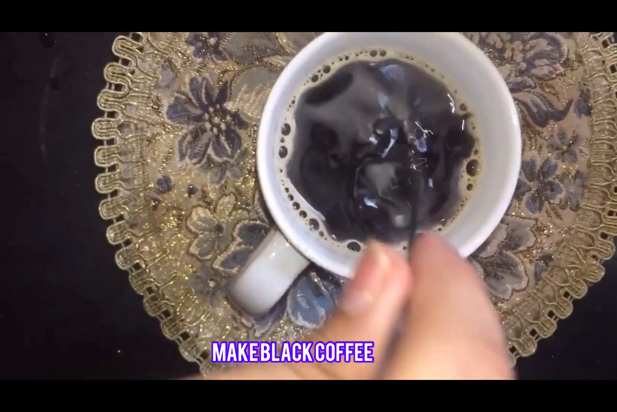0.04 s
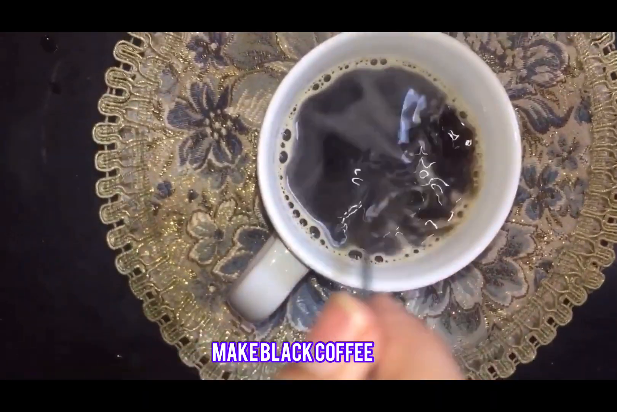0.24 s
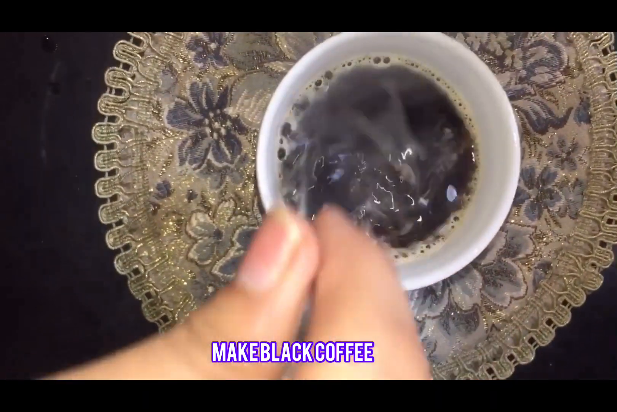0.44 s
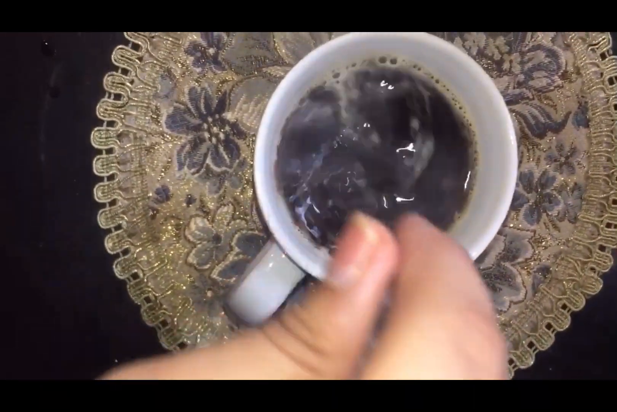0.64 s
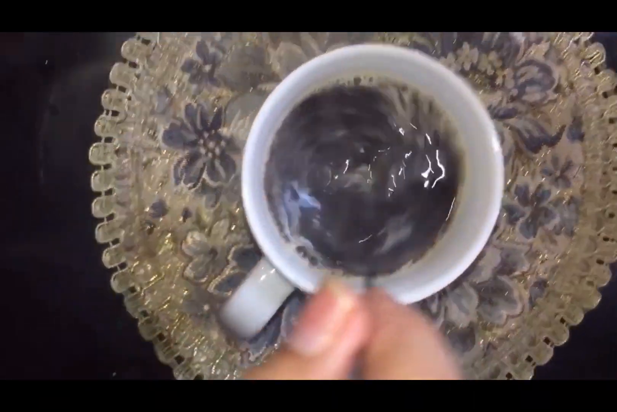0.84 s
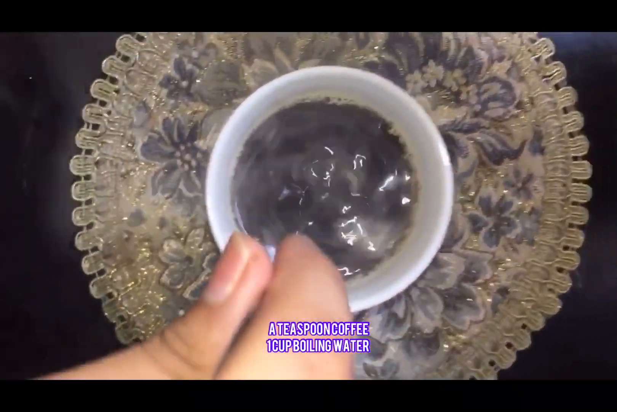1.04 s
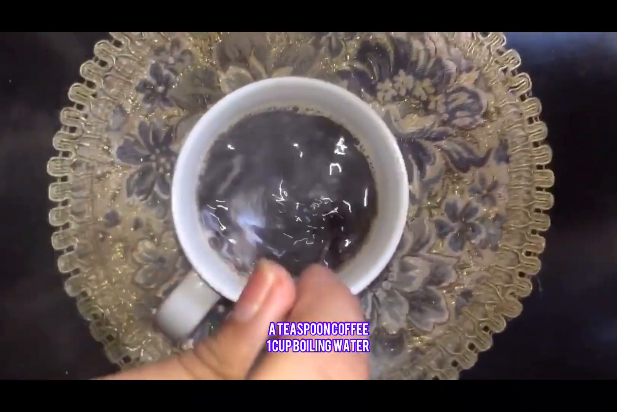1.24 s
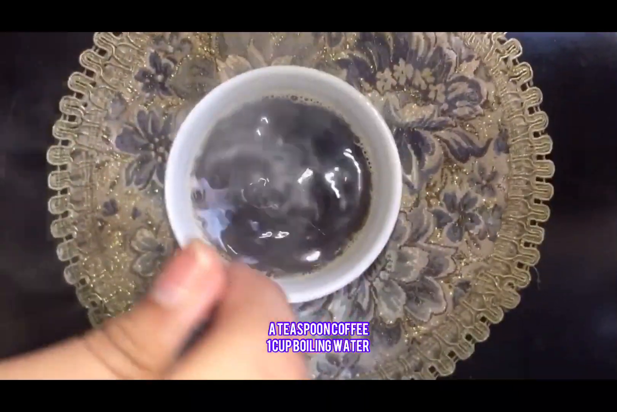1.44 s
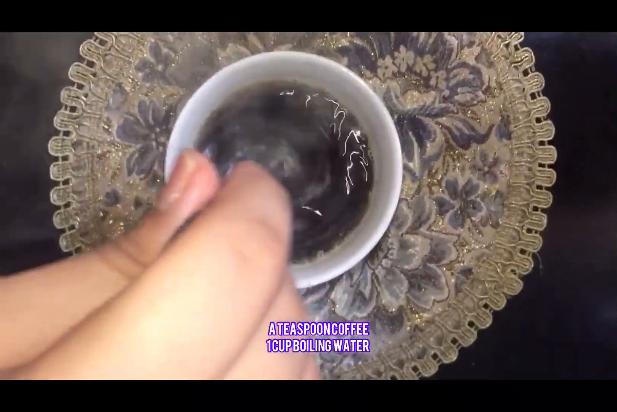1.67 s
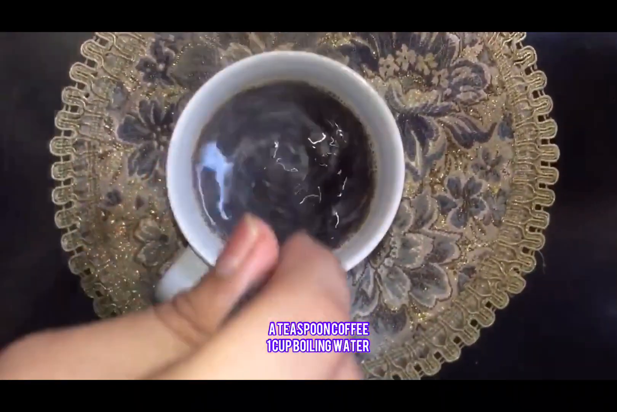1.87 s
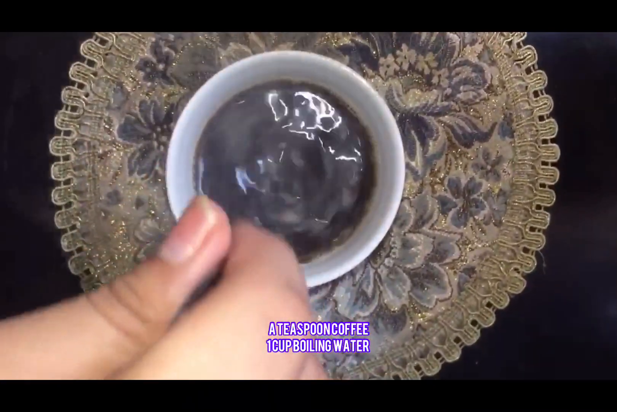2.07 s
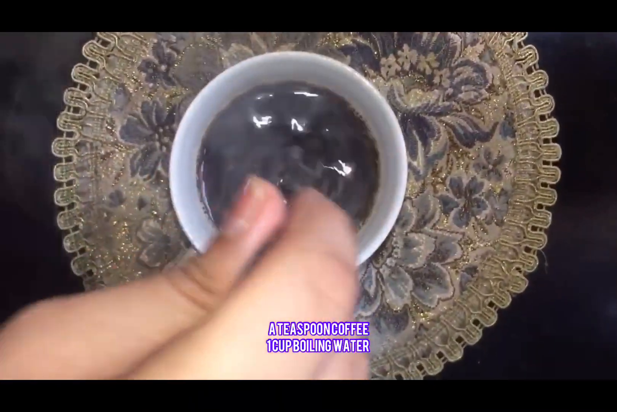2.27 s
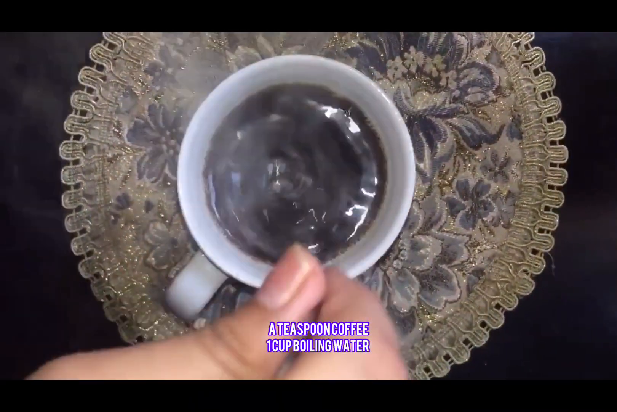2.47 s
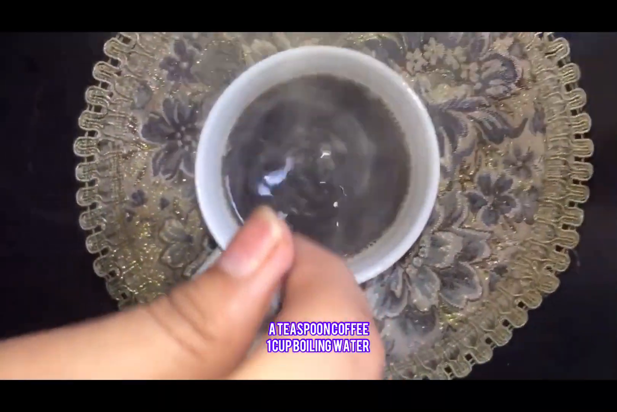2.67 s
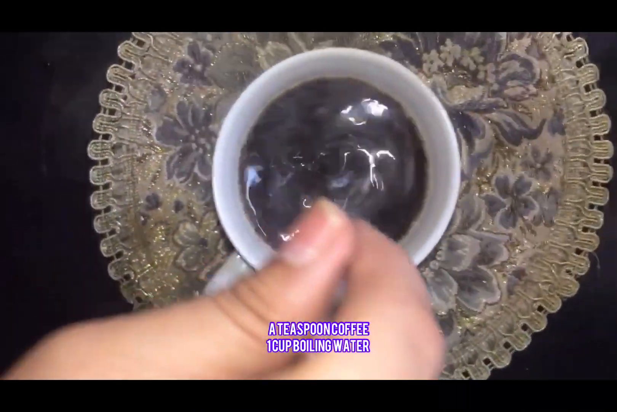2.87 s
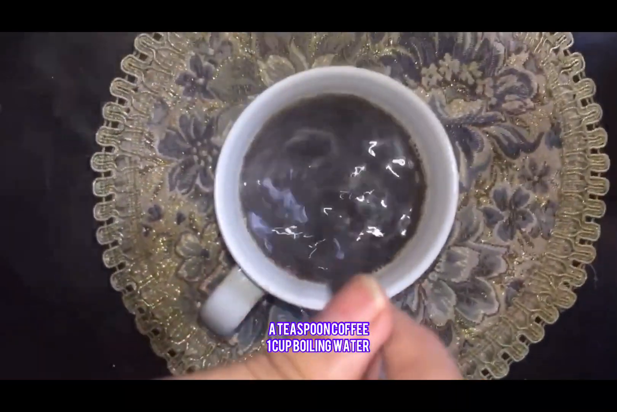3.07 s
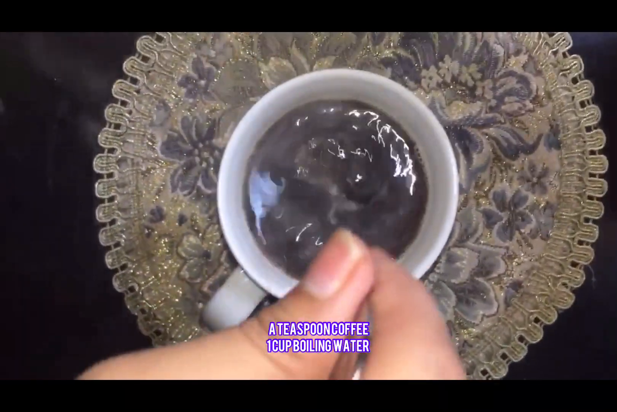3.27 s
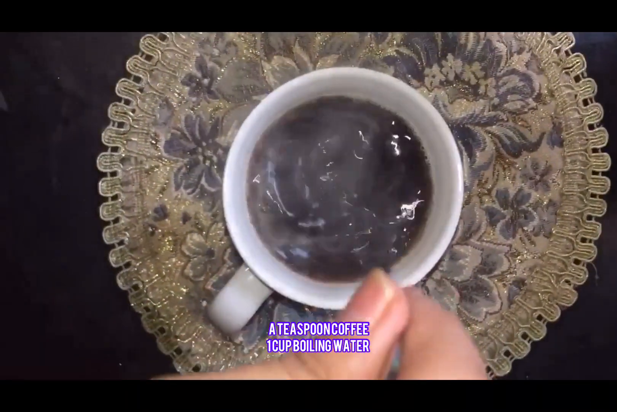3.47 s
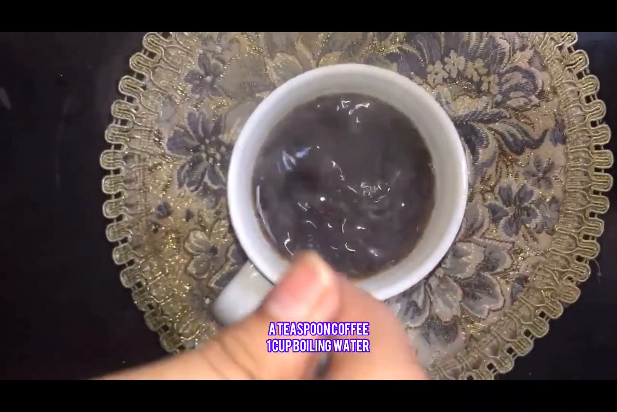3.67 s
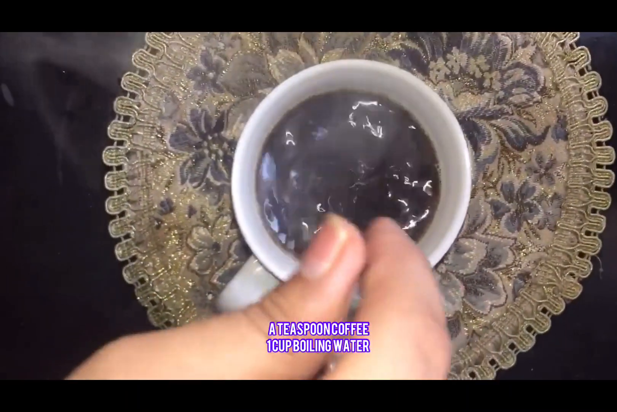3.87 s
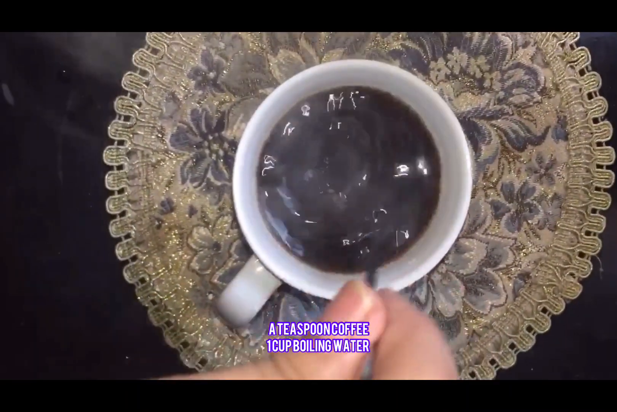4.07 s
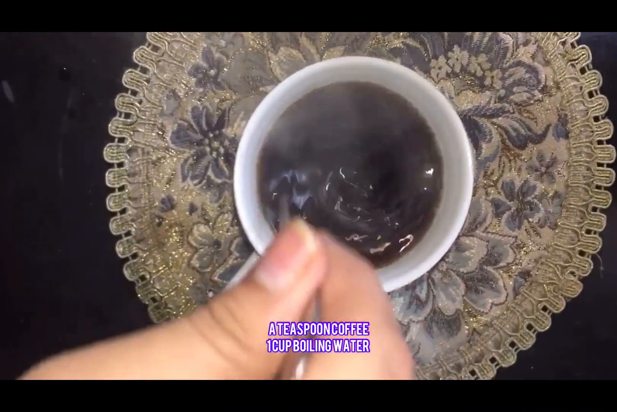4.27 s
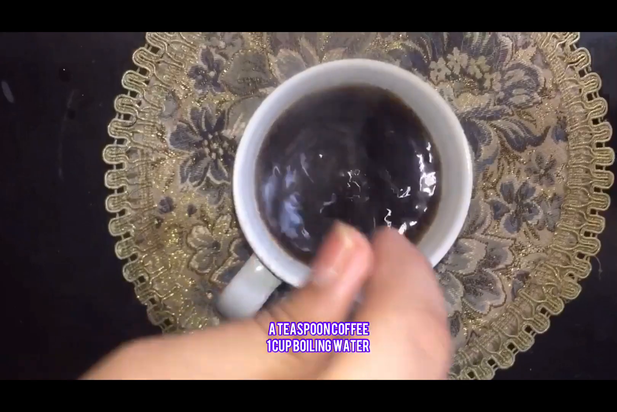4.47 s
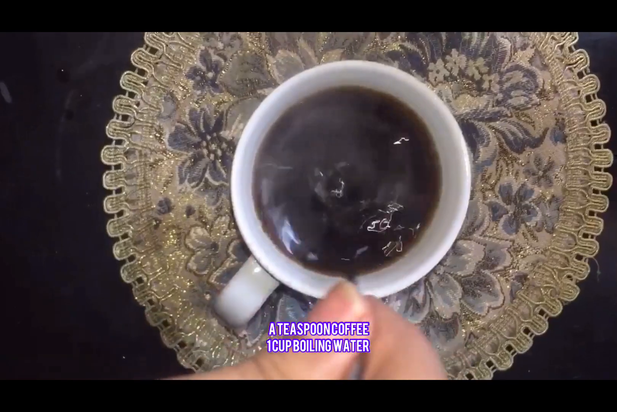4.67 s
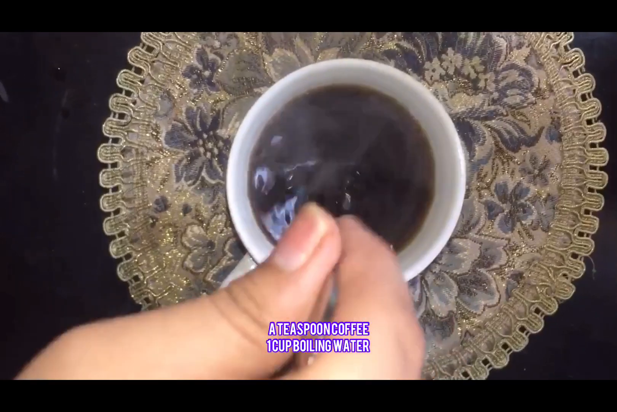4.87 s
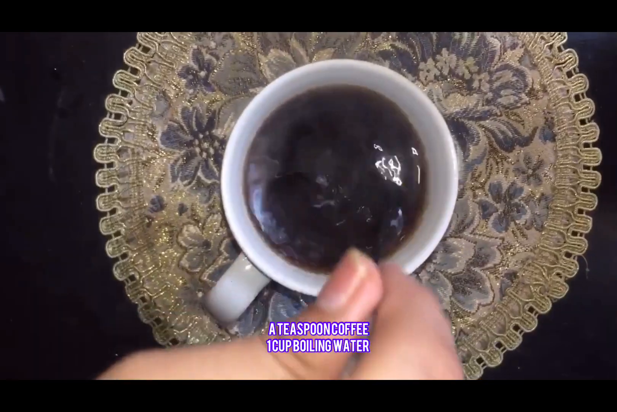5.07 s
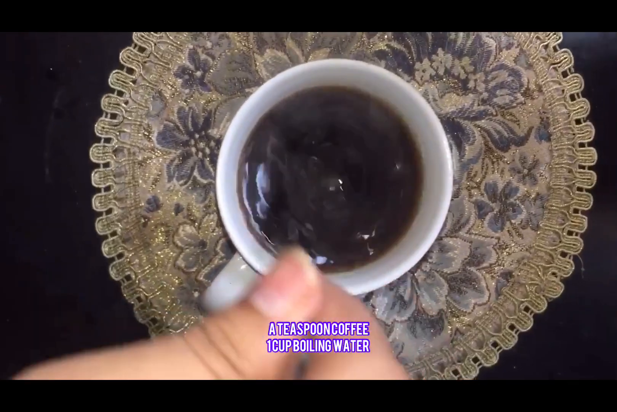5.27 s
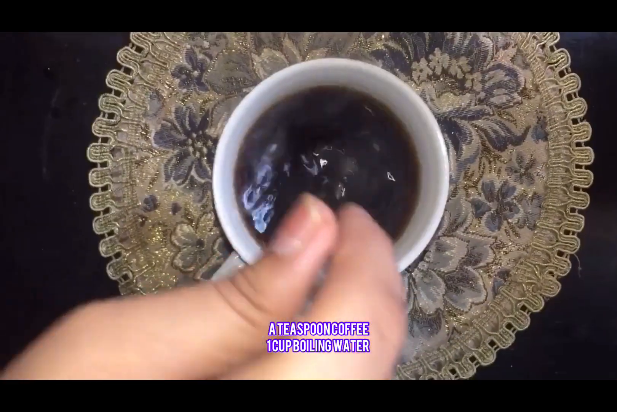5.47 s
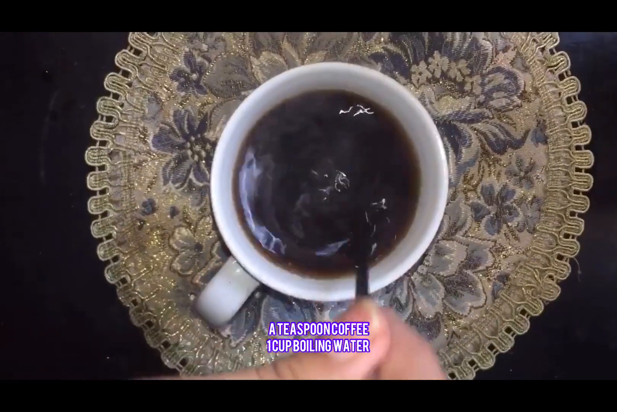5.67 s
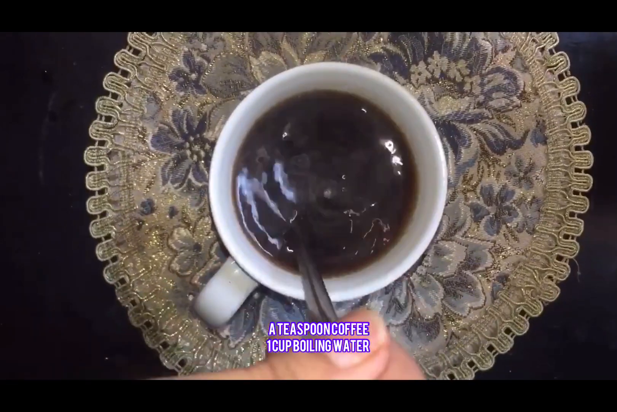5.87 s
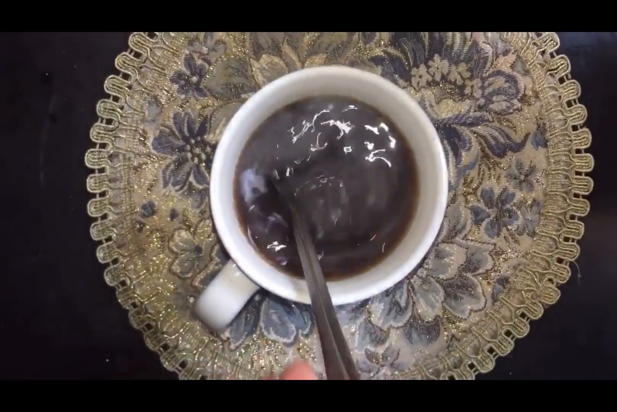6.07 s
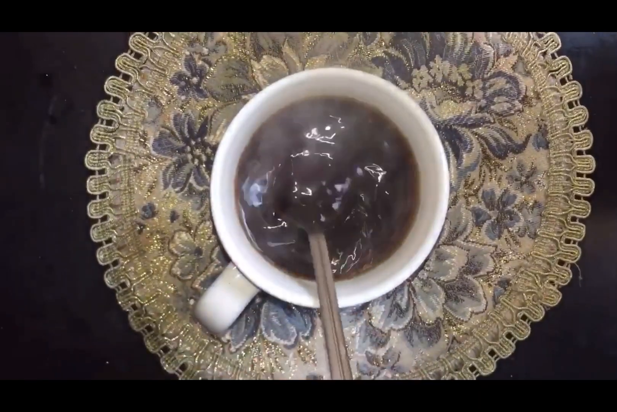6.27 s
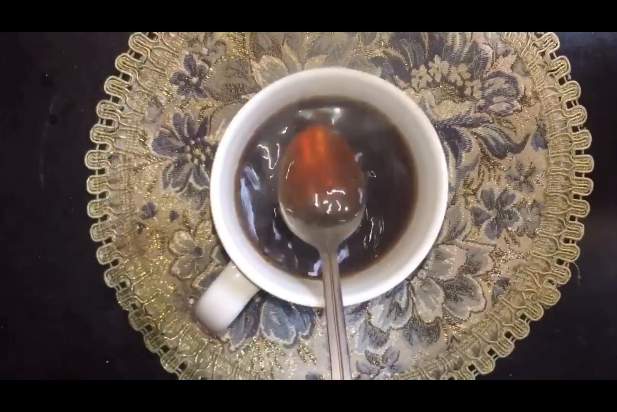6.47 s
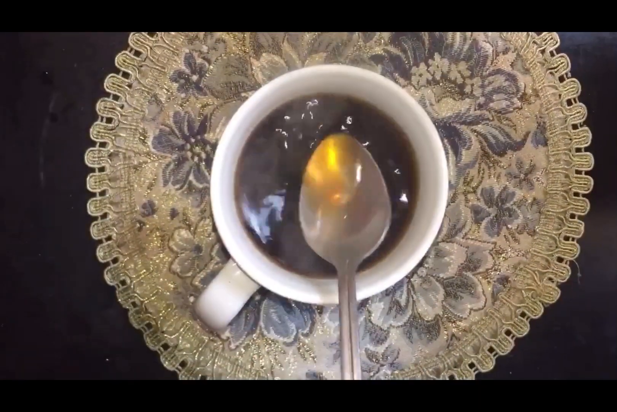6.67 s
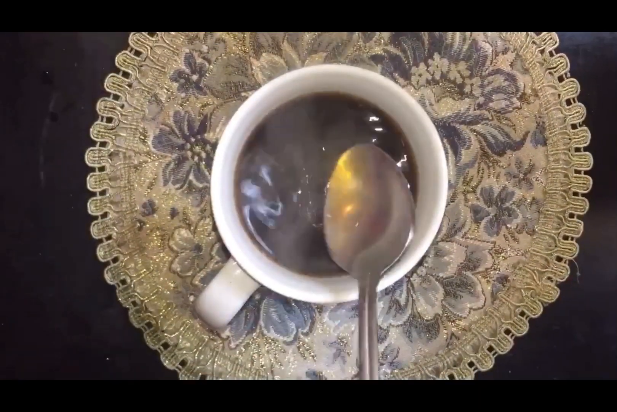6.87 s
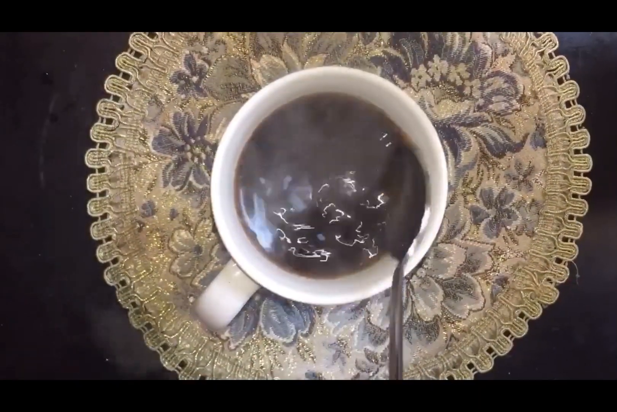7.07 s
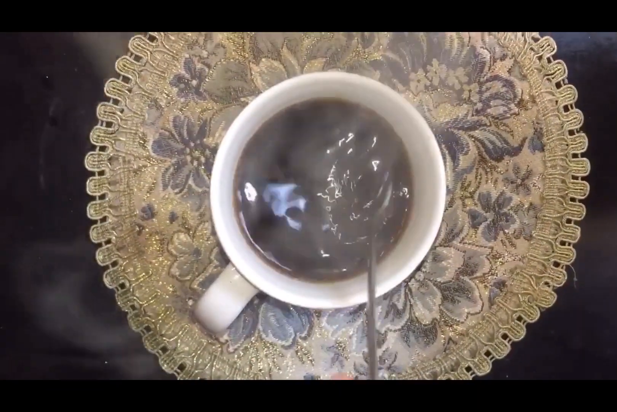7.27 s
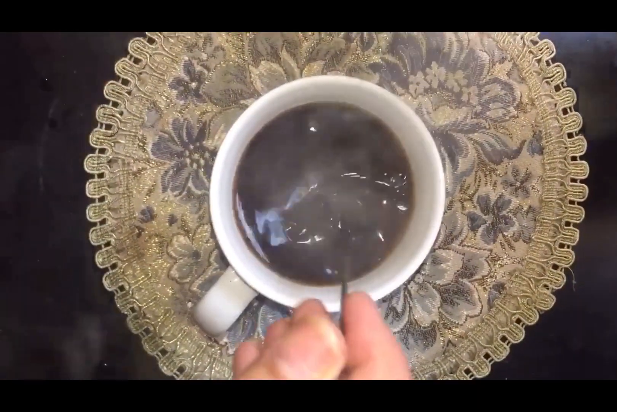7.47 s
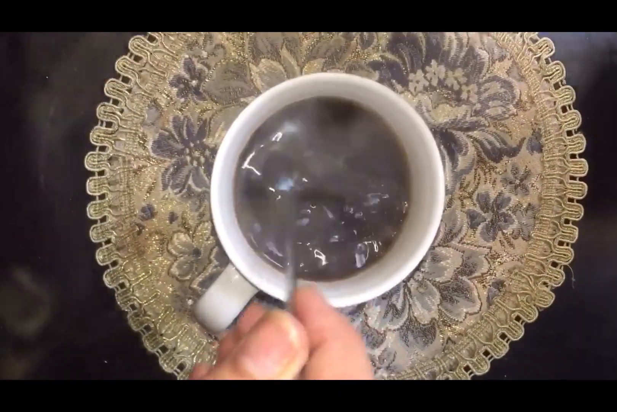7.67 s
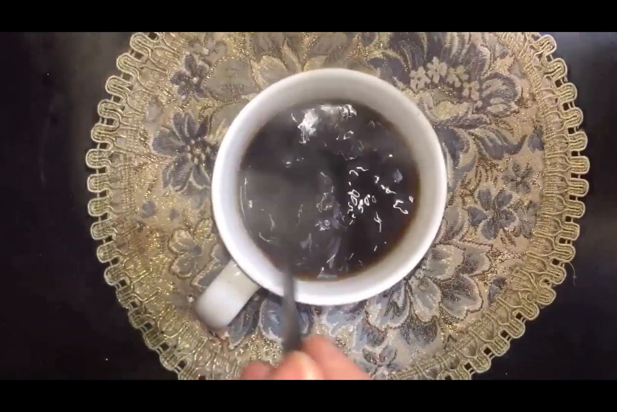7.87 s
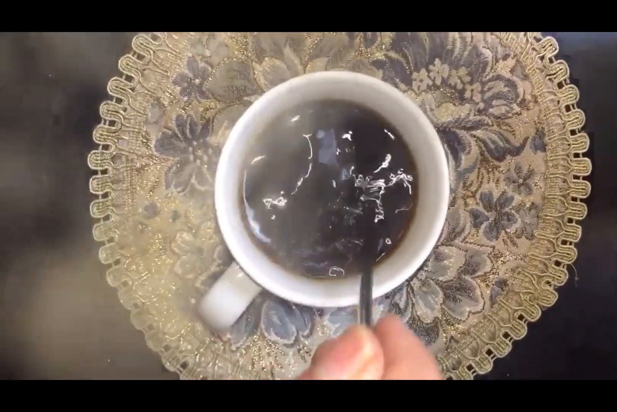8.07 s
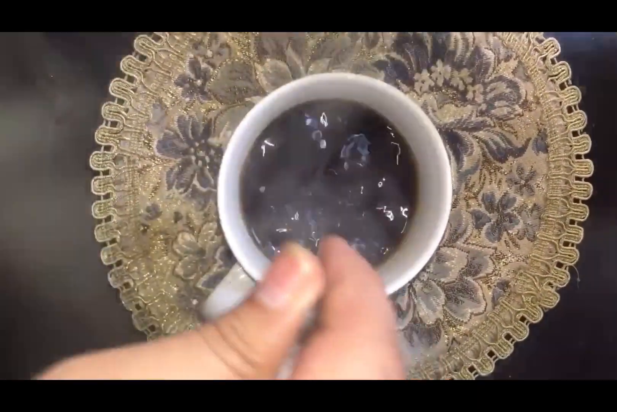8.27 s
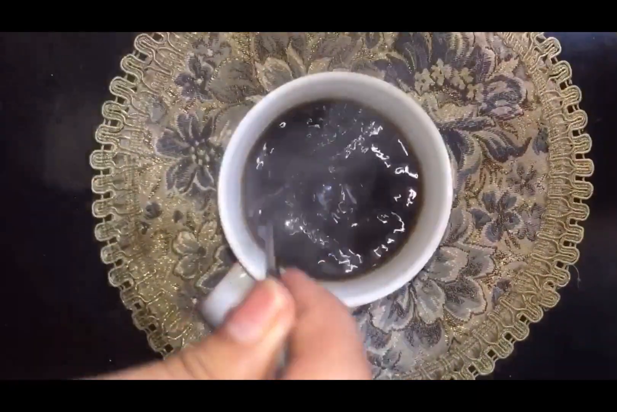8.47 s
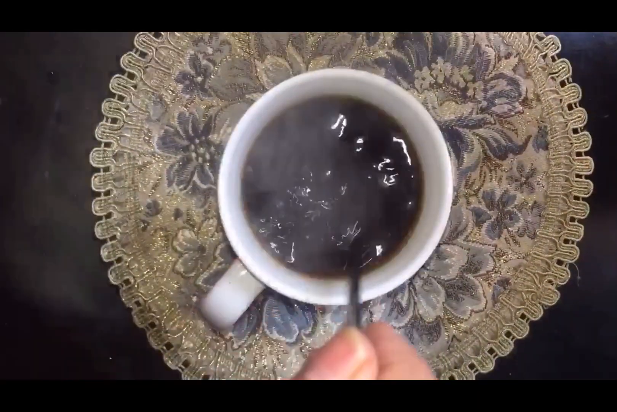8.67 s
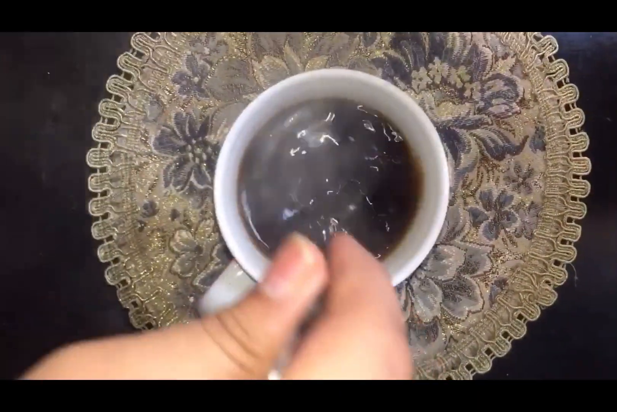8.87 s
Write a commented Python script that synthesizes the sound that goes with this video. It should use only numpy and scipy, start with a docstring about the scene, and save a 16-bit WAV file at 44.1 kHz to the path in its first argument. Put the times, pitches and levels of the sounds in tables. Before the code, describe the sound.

A steel teaspoon stirs coffee in a ceramic cup on a table, heard from close by. From the start it knocks the wall at irregular intervals, making short, ringing clinks, with a firmer one at about 0.5 seconds. From around 1 second, raspy drags over the glaze swell and fade between the clinks, with a few faint sliding squeaks. The scraping is strongest from about 3.7 to 5 seconds, and a hard knock follows near 5.4 seconds. Just after 6 seconds the stirring drops away for about a second. Clinks return at 7 seconds, with the hardest knock near 7.4, and scraping and tapping continue until about 9 seconds. The harder knocks carry a slight thump from the table. Throughout, a soft, low household motor hum swells about once a second over quiet room noise. The room adds only a very short echo.

```python
"""A steel teaspoon stirs coffee in a ceramic cup on a table, heard from close by.
The spoon drags over the glaze and knocks the wall; both ring the same damped modes of the full cup.
Drags add a rasp and a few sliding tones; knocks add a steel crack and thump the table top.
Household motors hum, swell and buzz behind it, and their pulses jolt the spoon when it touches lightly.
The cup has a short room tail, and soft room noise lies under everything."""
import sys
import numpy as np
from scipy import signal
from scipy.fft import rfft, irfft, next_fast_len
from scipy.io import wavfile
from scipy.ndimage import map_coordinates

SR = 44100
rng = np.random.default_rng(int(sys.argv[2]) if len(sys.argv) > 2 else 0)


def file_out(sig):
    """Save sig as 16-bit WAV at sys.argv[1]."""
    # one column per channel
    cols = np.atleast_2d(sig).T
    # limit, then scale
    lim = np.clip(cols, -1, 1)
    pcm = np.round(lim * 32767).astype(np.int16)
    wavfile.write(sys.argv[1], SR, pcm)


N = 393813
STEP, CHATTER = 64, 3000  # samples between control values, samples of chatter in a knock
SLIP_SHARE = 1.1  # stick-slip buzz against friction hiss in the rasp


def stirring():
    """The spoon knocks and drags in the cup: ringing ceramic plus the noises of contact."""
    _, knock_db, _, _, _, crack_db, _ = np.transpose(KNOCKS)
    rub_db, rub_hz, bright_db = strokes()
    grit = friction() + SLIP_SHARE / 2 * slips()
    jolted = jolts(rub_db)
    blows = rebounds(per_second=1200, level_db=-10, t60=0.07)
    ceramic = cup_ring(blows, grit, jolted, rub_db, rub_hz, bright_db)
    scrape = rasp(rub_db + 0.5 * bright_db - 5) * jolted
    clicks = steel_crack(blows, knock_db + crack_db + 9)
    thumps = table_thump(blows, 1.38 * knock_db - 0.14 * crack_db - 28)  # favours hard, dull blows
    return ceramic + scrape + clicks + thumps + glides()


# The spoon hits the wall. Each row: start in seconds, relative level in dB, centre of the body tone in
# Hz, offsets in dB for the rim, the upper modes and the crack, centre of the high ping in Hz.
KNOCKS = [(0.0387, -27, 1390, -10, -13, -5, 5460), (0.113, -23, 2030, -7, 9.5, -7, 2950),
          (0.1314, -35, 2070, 14.5, 13, -7, 2850), (0.522, -14, 1743, -23, -10.5, -28.5, 3050),
          (0.5664, -30.5, 1710, -20, -3, -17.5, 3000), (0.8079, -26, 2100, -7.5, 1.5, -7, 5500),
          (1.08, -30, 1633, -20, -24, -50, 3140), (1.231, -30.5, 2100, -23, 5.5, -6.5, 4700),
          (1.28, -29, 1947, -20, -7, -28, 3170), (1.331, -42, 1670, -9, 3, -28.5, 3040),
          (1.5779, -15, 1700, -38, -13, -43, 3200), (1.746, -17, 1780, -12, -7, -23.5, 3580),
          (1.9403, -27.5, 1820, 0.5, 9, -1, 4170), (2.316, -17, 1905, -4.5, -6.5, -15.5, 3520),
          (2.4383, -23.5, 1825, -5, 2, -14.5, 4040), (2.7765, -33, 1900, -26, -17, -30, 3270),
          (3.1282, -27, 1990, 4.5, 0.5, -8, 4900), (3.2178, -30, 1764, -12.5, -36, -41, 4550),
          (3.5059, -18.5, 1830, -11.5, 0, -14, 2820), (3.5186, -21, 1660, -19, -6.5, -19.5, 2740),
          (3.9753, -19, 1625, -12, -7.5, -14.5, 3310), (4.0594, -23, 1666, -12, 3, -11, 3290),
          (4.0896, -39, 1590, 2.5, -1, -18.5, 3130), (4.453, -30, 1590, -24, -4, -32, 4760),
          (4.585, -20, 1632, -12, -7, -19, 3230), (4.6287, -28, 1570, -15, -9, -33, 3250),
          (5.0639, -27, 1820, -2.5, 5.5, -6, 4070), (5.123, -25.5, 1820, -5.5, 4.5, -23, 3500),
          (5.168, -44.5, 1780, -14, 1, -12, 4300), (5.3698, -8, 1680, -32, -3, -18.5, 8780),
          (5.4365, -24, 1830, -25, -9, -29, 3270), (5.4712, -19, 1890, -15, -5, -17, 4900),
          (5.754, -28.5, 1910, -20, -19.5, -33, 4600), (5.998, -16, 1957, -33, -22, -28, 3170),
          (6.0127, -21, 1957, -35, -15, -23, 4220), (7.0302, -20.5, 1340, -5, -4, -5, 6940),
          (7.129, -53, 1930, -18, 1, -21.5, 3380), (7.1486, -22.5, 1910, -11.5, -0.5, -12.5, 7560),
          (7.423, -4, 2000, -22, -9, -28, 4570), (7.8388, -29.5, 1966, 8, 5, 0.5, 4700),
          (7.8758, -27, 1896, -6, -11, -21.5, 3400), (8.108, -32, 2000, -24, -4, -16, 4330),
          (8.158, -32, 1930, -14, -5.5, -15.5, 3450), (8.355, -27.5, 1830, -23, -14.5, -44, 3400),
          (8.433, -29, 1810, -28, -8, -25.5, 3730), (8.477, -27.5, 1930, -38, -30, -39, 3300),
          (8.6828, -29, 1970, 5.5, -2, -2.5, 4800), (8.769, -37.5, 1920, -9, -6, -16, 4370),
          (8.8474, -13, 1795, -20, -16, -32.5, 3370)]
def knocks(gains, blows):
    """The force of all knocks on the cup, each at its own time and gain."""
    force = np.zeros(N + SR)
    for (start, *_), gain, blow in zip(KNOCKS, gains, blows):
        force[round(start * SR):][:CHATTER] += gain * blow
    return force[:N]


def rebounds(per_second, level_db, t60):
    """One row for each knock: a unit blow, then a dying chatter of small random rebounds."""
    shape = (len(KNOCKS), CHATTER)
    blows = amp(level_db) * rng.standard_normal(shape) * (rng.random(shape) < per_second / SR)
    blows[:, 0] = 1
    return blows * die_away(t60)


# The spoon drags over the glaze. Each row: time of full pressure in seconds, relative level in dB,
# swell, hold and fade in seconds, centre of the body tone in Hz, brightness in dB.
STROKES = [(0.0, -54, .05, 0.016, 0.054, 1744, -8), (0.324, -58, .3, 0, 0.077, 2390, -22),
           (0.633, -47.5, 0.11, 0.089, 0.043, 1500, -15.5), (0.941, -35.5, 0.19, 0.09, 0.0069, 1540, -15.5),
           (1.19, -38.5, 0.099, 0, 0.14, 1650, -20), (1.505, -59, 0.32, 0, 0.029, 2330, -15),
           (1.579, -30.5, 0.0038, 0.11, 0.011, 1770, -8.5), (1.734, -38.5, 0.023, 0.041, 0.051, 1600, -9.5),
           (2.003, -35, 0.22, 0.15, 0.13, 1777, -19), (2.222, -33, 0.15, 0.024, 0.013, 1890, -8),
           (2.365, -39.5, 0.33, 0, 0.032, 2030, -15.5), (2.483, -43, 0.15, 0.096, 0.026, 1990, -20.5),
           (2.588, -40, 0.085, 0.041, 0.053, 1940, -47), (2.665, -37.5, 0.18, 0.00083, 0.028, 1970, -31.5),
           (2.778, -32.5, 0.003, 0.035, 0.074, 1984, -15.5), (2.865, -44.5, .06, .018, 0.011, 2000, -14),
           (3.043, -56, 0.33, 0, 0.14, 2000, -18), (3.104, -37, 0.008, 0.0014, 0.044, 1910, -24),
           (3.435, -50.5, 0.35, 0, 0.22, 1650, -14), (3.691, -27, 0.12, 0, 0.19, 1690, -21),
           (3.823, -28.5, 0.067, 0.029, 0.049, 1735, -9.5), (3.874, -45.5, 0.05, 0.033, 0.0075, 1600, 6.5),
           (4.026, -42.5, 0.36, 0, 0.067, 1570, -17), (4.203, -37, 0.21, 0.0023, 0.061, 1570, -15),
           (4.311, -24.5, 0.053, 0, 0.1, 1630, -18), (4.405, -34.5, 0.11, 0, 0.019, 1590, -6),
           (4.458, -38.5, 0.14, 0, 0.22, 1600, -13), (4.764, -29.5, 0.15, 0, 0.32, 1604, -21),
           (4.916, -23.5, 0.096, 0.02, 0.041, 1720, -11), (5.029, -39.5, 0.047, 0.021, 0.14, 1610, -10),
           (5.238, -32, 0.091, 0.019, 0.019, 1724, -17), (5.281, -45, 0.042, 0.02, 0.11, 2394, -11.5),
           (5.517, -39.5, 0.25, 0, 0.023, 1660, -10.5), (5.597, -45.5, 0.19, 0, 0.094, 1710, -11),
           (5.749, -46, 0.072, 0.011, 0.22, 1760, -25), (5.823, -30, 0.022, 0.0029, 0.017, 1890, -33),
           (5.879, -32.5, 0.047, 0.012, 0.0045, 1870, -24.5), (6.152, -60.5, 0.04, 0.051, 0.008, 1960, -23),
           (7.079, -51.5, 0.019, 0.021, 0.69, 2100, -25), (7.465, -52.5, 0.12, 0.0082, 0.061, 2130, -5),
           (7.797, -47.5, 0.36, 0.015, 0.24, 1850, -13), (8.006, -53, .3, 0.026, 0.039, 1850, -6),
           (8.134, -28, 0.063, 0.00062, 0.032, 1850, -17), (8.351, -34.5, 0.18, 0.0034, 0.1, 1830, -23),
           (8.426, -41, 0.082, 0.0017, 0.13, 1750, -13.5), (8.728, -46, 0.32, 0, 0.039, 2060, -28),
           (8.893, -33, 0.048, 0.017, 0.074, 1935, -20.5)]
def strokes(span_db=20, rounding=1.013):
    """Level, tone and brightness of the drag; where strokes overlap, the louder one leads."""
    full_s, db, swell, hold, fade, tone_hz, bright_db = np.transpose(STROKES)[:, :, None]
    t = np.arange(0, N, STEP) / SR - full_s
    away = np.maximum(-t / swell, 0) + np.maximum((t - hold) / fade, 0)  # 0 at full pressure
    power = amp(np.maximum(db - span_db * away ** rounding, -150)) ** 2
    total = power.sum(axis=0)
    share = power / total
    return 10 * np.log10(total), (share * tone_hz).sum(axis=0), (share * bright_db).sum(axis=0)


def friction():
    """Steel on glaze: a hiss of catches that comes in lumps."""
    return unit(rng.standard_normal(N) * fine(amp(2 * wobble(30) + 2.57 * wobble(150))))


def slips():
    """The edge sticks and slips at a gliding rate: a buzzy stack of tones that comes and goes."""
    slip_hz = fine(760 * amp(2.2 * wobble(9) + 0.35 * wobble(160)))
    pulses = np.diff(np.floor(np.cumsum(slip_hz) / SR), prepend=0)
    return unit(pulses * fine(amp(5 * wobble(14))))


def jolts(rub_db, jolt_db=12, t60=0.012, light_touch_db=-46):
    """A gain on the drag: motor pulses come through the table and jolt a spoon that touches lightly."""
    kick = signal.lfilter([1], [1, -amp(-60 / (t60 * SR))], motor_pulses())
    lightness = fine(1 / (1 + amp(2 * (rub_db - light_touch_db))))
    return 1 + amp(jolt_db) * kick * lightness


# The modes of the full cup in six groups, low to high. Each row: pitch in Hz, relative level when struck
# in dB, relative level when rubbed in dB, time to die by 60 dB in seconds.
LOW_MODES = [(352.5, -20.5, -11.5, 0.028), (506, -27, -20.5, 0.019), (616.8, -31.5, -13, 0.14)]
MIDDLE_MODES = [(943.5, -19.5, -6, 0.028), (1032.5, -8, -6.5, 0.07)]
BODY_MODES = [(1346, -1.5, 2.5, 0.035), (1429, -4.5, -1.5, 0.083), (1544, -4.5, 1, 0.046),
              (1633, -12, -2.5, 0.044), (1674.5, 9.5, -0.5, 0.039), (1775, -3, 3, 0.024),
              (1841, 9, 0, 0.044), (1886, 4.5, 0, 0.049), (1948, 3, 2.5, 0.033), (2089, 5, -13, 0.075)]
RIM_MODES = [(2345, 1, -2, 0.17), (2400, -6, -4, .07), (2460, 0, -1, 0.11)]
UPPER_MODES = [(2717, -10, -1.5, 0.005), (2810, -1.5, -4.5, 0.0092), (3168, -2.5, -3, 0.018),
               (3307, -6.5, -0.5, 0.034), (3550, 3.5, -2.5, 0.006), (4130, -4, -24, 0.015),
               (4360, -4.5, -16, 0.017), (4768, -9, -17, 0.025), (5490, -10.5, -21.5, 0.035)]
TREBLE_MODES = [(5930, -3, -22, 0.04), (6280, -5, -24, 0.025), (6910, -4, -32, .03), (7220, -5, -43, 0.03),
                (8830, -4.5, -32.5, 0.017), (11400, -9, -48, .015)]
# The swirling drink detunes the rim. Each row: time in seconds, pitch of the lowest rim mode in Hz.
RIM_PITCH = [(0.1, 2412), (0.2, 2412), (0.33, 2345), (1.9, 2325), (2.3, 2352), (3.13, 2374), (4.05, 2325),
             (7.05, 2395), (7.15, 2355), (7.42, 2380), (7.84, 2352), (8.7, 2340)]
def cup_ring(blows, grit, jolted, rub_db, rub_hz, bright_db):
    """Knocks and strokes drive every mode of the cup, each at its own strength."""
    _, knock_db, body_hz, rim_db, upper_db, crack_db, ping_hz = np.transpose(KNOCKS)
    sway = wobble(9)  # the tilt of the spoon bends the modes together
    swirl = np.interp(np.arange(N) / SR, *np.transpose(RIM_PITCH)) / RIM_MODES[0][0]

    def group(modes, blow_db, drag_db, band_hz, scatter_db, drift=0, detune=1, flicker_db=2.5,
              struck_hz=body_hz, struck_dip_db=0, rubbed_dip_db=0, drag_gain=jolted):
        """Neighbouring modes that radiate in their own band."""
        out = np.zeros(N)
        scatter = rng.normal(0, scatter_db, (len(KNOCKS), len(modes)))
        for k, (hz, struck_db, rubbed_db, t60) in enumerate(modes):
            struck = amp(blow_db + struck_db + scatter[:, k])
            struck *= contact_gain(hz, struck_hz, 0.046 * hz, struck_dip_db)
            rubbed = amp(drag_db + rubbed_db + flicker_db * wobble(11))
            rubbed *= contact_gain(hz, rub_hz, 200, rubbed_dip_db)
            # a blow starts all modes in step; a sliding contact drives neighbours in opposite sense
            force = knocks(struck, blows) + (-1) ** k * drag_gain * grit * fine(rubbed)
            bend = fine(1 + drift * (sway + wobble(12)))
            out += ring(force, hz * detune * bend, t60)
        return band(out, *band_hz)

    low = group(LOW_MODES, knock_db - 20.5, 1.39 * rub_db + 0.58 * bright_db - 19.5,
                band_hz=(240, 900), scatter_db=7.5)
    middle = group(MIDDLE_MODES, knock_db - 19.5, 0.9 * rub_db + 0.16 * bright_db - 39,
                   band_hz=(820, 1500), scatter_db=0, drift=0.03)
    body = group(BODY_MODES, knock_db - 12.5, rub_db - 25,
                 band_hz=(970, 2195), scatter_db=3.5, drift=0.011, struck_dip_db=-25.5, rubbed_dip_db=-17)
    rim = group(RIM_MODES, knock_db + rim_db - 8.5, rub_db - 26.5,
                band_hz=(2250, 2600), scatter_db=2, drift=0.003, detune=swirl, rubbed_dip_db=-20)
    upper = group(UPPER_MODES, knock_db + upper_db - 2, 1.113 * rub_db + 1.16 * bright_db - 14,
                  band_hz=(2500, 6200), scatter_db=7, drift=0.0093, flicker_db=3,
                  struck_hz=ping_hz, struck_dip_db=-12.5, drag_gain=1)
    treble = group(TREBLE_MODES, knock_db + crack_db + 2.5, 1.055 * rub_db + 1.57 * bright_db - 12.5,
                   band_hz=(6100, 21000), scatter_db=1.5, drift=0.0045, flicker_db=5,
                   struck_hz=ping_hz, struck_dip_db=-14.5, drag_gain=0.96)
    return low + middle + body + rim + upper + treble


def ring(force, hz, t60):
    """One mode: a unit blow gives a unit sine that dies in t60 seconds; its pitch may drift."""
    turn = np.exp(2j * np.pi * np.cumsum(hz * np.ones(N)) / SR)
    pole = amp(-60 / (t60 * SR))
    return (turn * signal.lfilter([1], [1, -pole], force * turn.conj())).imag


def contact_gain(hz, centre_hz, width_hz, floor_db):
    """The place of contact favours the modes near one tone."""
    closeness = np.exp(-0.5 * ((hz - centre_hz) / width_hz) ** 2)
    return amp(floor_db * (1 - closeness))


# The colour of the scrape. Each row: frequency in Hz, gain in dB.
RASP_EQ = [(250, -31), (480, -28), (1000, -4.5), (1600, 2.5), (2250, 1.5), (3500, -12), (6000, -39.5),
           (12000, -70)]
def rasp(level_db):
    """The broad noise of steel catching and slipping on the glaze."""
    return fine(amp(level_db)) * unit(coloured(friction() + SLIP_SHARE * slips(), RASP_EQ))


# The colour of the crack. Each row: frequency in Hz, gain in dB.
CRACK_EQ = [(400, -50), (1200, -9), (3000, 1.5), (6000, -10), (9000, -6), (10300, -19), (12000, -16),
            (16000, -29)]
def steel_crack(blows, level_db):
    """The steel edge cracks for a few milliseconds at each contact."""
    force = knocks(amp(level_db), blows * die_away(0.037))
    envelope = signal.oaconvolve(abs(force), die_away(0.004))[:N]
    return coloured(rng.standard_normal(N) * envelope, CRACK_EQ)


def table_thump(blows, level_db):
    """Blows on the cup ring one low mode of the table top."""
    return band(ring(knocks(amp(level_db), blows), hz=91.8, t60=0.13), 78, 210)


# Short tones while the spoon drags. Each row: start in seconds, length in seconds, first and last pitch
# in Hz, relative level in dB.
GLIDES = [(0.873, 0.053, 1036, 880, -58), (0.916, 0.049, 965, 863, -59), (2.079, 0.12, 487, 630, -65),
          (2.541, 0.072, 916, 1203, -57), (2.587, .075, 1078, 682, -56.5), (4.291, 0.039, 494, 620, -63),
          (4.823, .09, 493, 630, -64)]
def glides(overtone_step_db=-7.5):
    """Each tone and its three overtones slide evenly in pitch, fluttering, with soft ends."""
    out = np.zeros(N + SR)
    flutter = fine(1.1 * wobble(110))
    for start, length, from_hz, to_hz, db in GLIDES:
        progress = np.arange(round(length * SR)) / (length * SR)
        span = slice(round(start * SR), round(start * SR) + len(progress))
        turns = length * (from_hz * progress + (to_hz - from_hz) * progress ** 2 / 2)
        phase = 2 * np.pi * turns + flutter[span]
        tone = sum(amp(overtone_step_db * k) * np.sin((k + 1) * phase) for k in range(4))
        out[span] += amp(db) * np.sin(np.pi * progress) * tone
    return 2 * out[:N] * fine(amp(0.83 * wobble(90)))


def motor_hum(hz=98.27, level_db=-56, swell_hz=1.09, depth=0.6, crest_s=4.55):
    """A motor hum that swells once for each turn of a slower part."""
    t = np.arange(N) / SR
    swell = 1 + depth * np.cos(2 * np.pi * swell_hz * (t - crest_s))
    level = fine(amp(level_db + 3.3 * wobble(6.5)))
    phase = 2 * np.pi * hz * t + fine(0.29 * wobble(2.5))
    return np.sqrt(2) * swell * level * np.sin(phase)


# The drone of the household motors. Each row: pitch in Hz, rms level in dB.
MOTOR_TONES = [(56.5, -64), (110.4, -70), (169.6, -72), (196.5, -78), (226.1, -73), (540, -87),
               (933.5, -84)]
def motor_tones():
    """Motor tones of steady pitch, each wavering in level."""
    t = np.arange(N) / SR
    out = np.zeros(N)
    for hz, db in MOTOR_TONES:
        out += fine(amp(db + 3.8 * wobble(12))) * np.sin(2 * np.pi * (hz * t + rng.random()))
    return np.sqrt(2) * out


def motor_pulses(pair_hz=38.58, strong_pulse_s=6.7765):
    """A motor's pulses, strong and weak in turn."""
    count = np.floor(2 * pair_hz * (np.arange(N) / SR - strong_pulse_s))
    return np.diff(count, prepend=count[0]) * (1 + 0.6 * np.cos(np.pi * count))


def motor_buzz(level_db=-75.5, band_hz=(1300, 2600)):
    """The pulses heard directly, as a faint, thin buzz."""
    return amp(level_db) * unit(band(band(motor_pulses(), *band_hz), *band_hz))


def room_tail(x, t60=0.28, delay_samples=300):
    """A short dull tail from the walls."""
    tail = band(rng.standard_normal(SR // 2) * die_away(t60, SR // 2), 250, 9500)
    return signal.fftconvolve(np.pad(x, (delay_samples, 0)), tail / np.linalg.norm(tail))[:N]


# The noise floor of the room. Each row: frequency in Hz, noise density in dB per Hz.
ROOM_SPECTRUM = [(32, -101.5), (42, -87.5), (70, -100.5), (95, -71), (135, -91), (210, -83.5), (300, -93.5),
                 (480, -101), (1000, -103), (2500, -110), (6000, -115), (10300, -122), (12500, -120),
                 (16000, -127)]
def room_noise():
    """Soft, steady noise, strongest in the bass."""
    return coloured(np.sqrt(SR / 2) * rng.standard_normal(N), ROOM_SPECTRUM)


def wobble(rate):
    """A smooth random control curve, rate knots a second."""
    return map_coordinates(rng.standard_normal(2000), [np.arange(0, N, STEP) * rate / SR])


def fine(control):
    """A control curve at one value per sample."""
    return np.interp(np.arange(N), np.arange(0, N, STEP), control)


def die_away(t60, samples=CHATTER):
    """An envelope that falls 60 dB in t60 seconds."""
    return amp(-60 * np.arange(samples) / SR / t60)


def band(x, lo_hz, hi_hz):
    """A causal band-pass."""
    return signal.sosfilt(signal.butter(2, [lo_hz, hi_hz], "bandpass", fs=SR, output="sos"), x)


def coloured(x, points):
    """x through an EQ of (Hz, dB) points on a log axis."""
    size = next_fast_len(N + 8192)
    hz, db = np.transpose(points)
    gain = amp(np.interp(np.log(np.fft.rfftfreq(size, 1 / SR) + 1), np.log(hz), db))
    return irfft(rfft(x, size) * gain, size)[:N]


def amp(db):
    """Gain of a level in dB."""
    return 10 ** (np.asarray(db) / 20)


def unit(x):
    """x at rms 1."""
    return x / np.sqrt(np.mean(x ** 2) + 1e-20)


def scene():
    """The stirred cup up front, then its room tail, the motors and the room noise, in mono."""
    cup = stirring()
    air = room_noise()
    tail = amp(-21) * room_tail(cup)
    motors = motor_hum() + motor_tones() + motor_buzz()
    return (cup + tail + motors + air)[None]


def record(dry, top_hz=16400):
    """A steep cut removes the very top of the treble."""
    size = next_fast_len(N + 8192)
    passband = np.fft.rfftfreq(size, 1 / SR) < top_hz
    return irfft(rfft(dry, size) * passband, size)[..., :N]


dry = scene()
out = record(dry)
file_out(out)
```